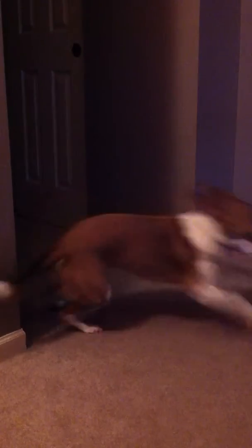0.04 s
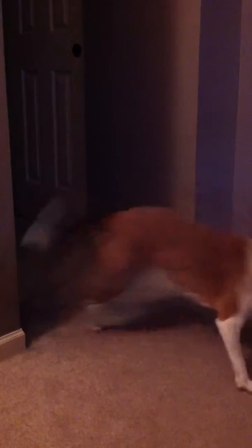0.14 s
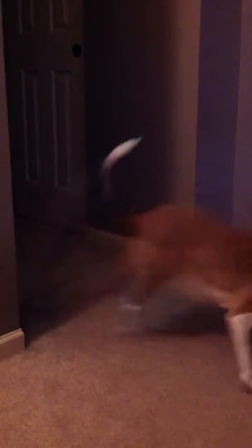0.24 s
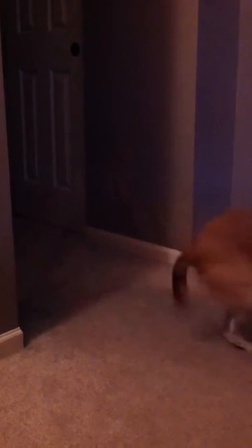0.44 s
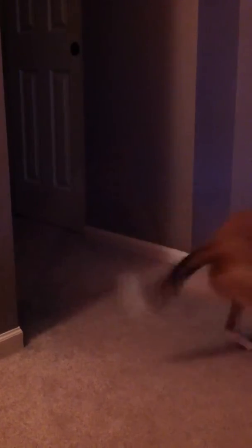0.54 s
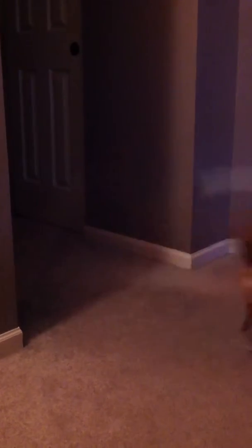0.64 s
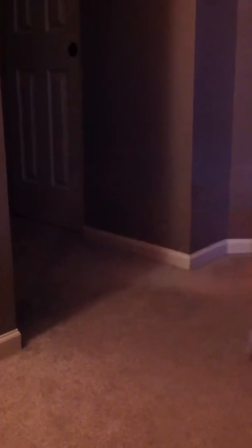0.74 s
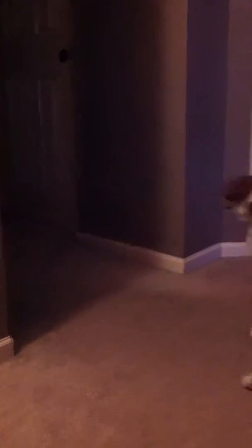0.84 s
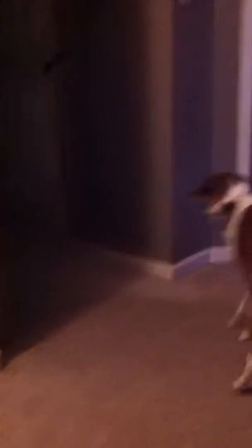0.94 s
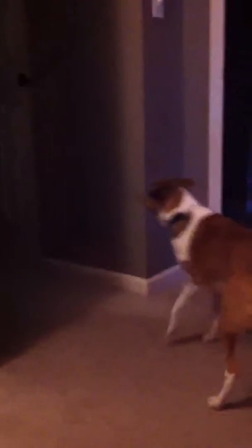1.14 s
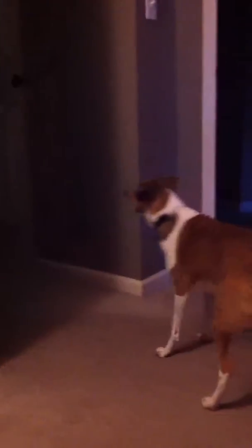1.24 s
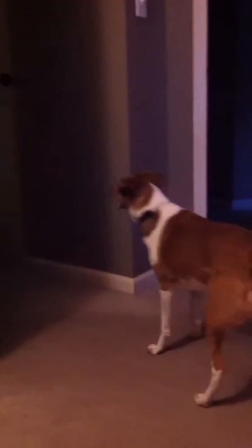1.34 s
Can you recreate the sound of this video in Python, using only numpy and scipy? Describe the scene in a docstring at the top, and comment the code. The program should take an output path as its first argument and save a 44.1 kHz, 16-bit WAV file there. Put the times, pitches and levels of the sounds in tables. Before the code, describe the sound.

Close indoor pickup of a dog: a faint wooden thud fades, a clear rising and falling yelp, then a rough bark, with light tag jingles, soft carpet footfalls, short wall echo and low microphone hiss.

```python
"""A dog barks twice in a carpeted hallway: voiced pulses and gated breath through throat resonances.
The first bark is a clear rising and falling yelp, the second starts hoarse and breaks up to a steady note.
As it trots, ringing metal tags jingle and paws pat the floor in low noise. A wooden thud, a set of fading
tones, dies away at the start and fur rustles in a swell of noise at the end. The walls answer barks and
tags; house and microphone hiss lies under everything."""
import sys
import numpy as np
from scipy import signal
from scipy.fft import rfft, irfft, next_fast_len
from scipy.io import wavfile
from scipy.ndimage import uniform_filter1d, minimum_filter1d, map_coordinates

SR = 44100
rng = np.random.default_rng(int(sys.argv[2]) if len(sys.argv) > 2 else 0)


def rack_gain(trim_db):
    """Turn a fader trim in dB into the linear factor to multiply a signal by."""
    fader = np.asarray(trim_db, float)
    return 10 ** (fader / 20)


def dump_mix(stems):
    """Bounce the given channels to the path in sys.argv[1] as a 16-bit WAV at rate SR."""
    frames = np.atleast_2d(stems).T  # one column per channel
    limited = np.clip(frames, -1, 1)  # hard clip at full scale
    pcm = np.round(limited * 32767).astype(np.int16)
    wavfile.write(sys.argv[1], SR, pcm)


N = 61739
T = np.arange(N) / SR


def unit(x):
    """Scales a signal to rms 1."""
    return x / np.sqrt(np.mean(x ** 2) + 1e-20)


def along(points, hz):
    """Reads (f/Hz, value) points on a logarithmic frequency axis."""
    f, value = np.transpose(points)
    return np.interp(np.log(hz + 1), np.log(f + 1), value)


def wobble(per_s):
    """A smooth random curve with per_s knots a second."""
    return map_coordinates(rng.standard_normal(N // 8), [T * per_s])


def filtered(x, response):
    """Multiplies the spectrum of x by a complex response of frequency."""
    m = next_fast_len(N + SR // 2)
    return irfft(rfft(x, m) * response(np.fft.rfftfreq(m, 1 / SR)), m)[:N]


def hiss(spectrum):
    """Noise of rms 1 coloured by (f/Hz, density/dB per Hz) points."""
    return unit(filtered(rng.standard_normal(N), lambda hz: rack_gain(along(spectrum, hz))))


# colour of the house and microphone hiss: f/Hz, relative density/dB per Hz
HUSH_COLOUR = [(20, -29), (60, -22), (140, 3.5), (330, -11), (700, -5), (1500, -3), (3000, -15.5),
               (5000, -19), (10000, -24), (13000, -33.5), (15500, -51), (17000, -102)]
HUSH_DB = -67


def hush():
    """The quiet house and the microphone's own noise, a steady coloured hiss."""
    return rack_gain(HUSH_DB) * hiss(HUSH_COLOUR)


# reverberation time of the hallway: f/Hz, fall by 60 dB t/s
HALL_T60 = [(200, 0.8), (550, 0.34), (900, 0.48), (1230, 0.46), (1800, 0.4), (3500, 0.44), (9000, 0.46)]
HALL_DB, NEAR_WALLS_DB, NEAR_WALLS_T60_S = -8.5, -5, 0.048
HALL_DELAY_S = 0.006  # the first answer travels some 2 m further than the direct sound


def hall(x):
    """Adds sparse quick answers of the near walls and a tail whose frequencies die at their own speeds."""
    t = T[:SR]
    hz, frame_t, z = signal.stft(rng.standard_normal(SR), SR, nperseg=256)
    fade = rack_gain(-60 * frame_t / along(HALL_T60, hz)[:, None])
    tail = signal.istft(z * fade, SR, nperseg=256)[1][:SR]
    sparse = rng.standard_normal(SR) * (rng.random(SR) < .02)
    near = sparse * rack_gain(-60 * t / NEAR_WALLS_T60_S)
    onset = np.clip(t / HALL_DELAY_S - 1, 0, 1)
    answer = np.zeros(SR)
    for db, part in ((HALL_DB, tail), (NEAR_WALLS_DB, near)):
        answer += rack_gain(db) * part * onset / np.linalg.norm(part * onset)
    return x + signal.fftconvolve(x, answer)[:N]


# modes of the knocked wood: f/Hz, level/dB, fall by 60 dB t/s
THUD_MODES = [(150, -38, 0.3), (327.7, -39, .17), (510, -59, 0.26), (590, -39.5, 0.19), (690, -51.5, 0.35),
              (930, -66.5, .5), (1150, -62, 0.67)]
THUD_AIR_DB, THUD_AIR_T60_S = -50.5, .45


def thud():
    """The dying ring of a knock on wood: slightly unsteady decaying modes over fading noise."""
    ring = np.zeros(N)
    for hz, db, t60 in THUD_MODES:
        level = rack_gain(db + 2.5 * wobble(35) - 60 * T / t60)
        ring += level * np.sin(2 * np.pi * (hz * T + rng.random()))
    air = hiss([(60, -31.5), (150, -5), (330, -5), (600, -3.5), (1500, -15.5), (3500, -25),
                (8000, -44.5), (16000, -60)])
    return ring + rack_gain(THUD_AIR_DB - 60 * T / THUD_AIR_T60_S) * air


# colour of the rubbing fur: f/Hz, relative density/dB per Hz
RUSTLE_COLOUR = [(150, -43), (400, -11.5), (900, -2.5), (1700, -6), (3000, -8), (5000, -15.5),
                 (9000, -27.5), (13000, -40), (16000, -70)]
RUSTLE_S, RUSTLE_RISE_S, RUSTLE_FALL_S, RUSTLE_DB = 1.29, 0.039, 0.078, -65.5  # peak, time constants


def rustle():
    """Rubbing fur, a short soft swell of coloured noise."""
    time_constant = np.where(T < RUSTLE_S, RUSTLE_RISE_S, RUSTLE_FALL_S)
    swell = np.exp(-np.abs(T - RUSTLE_S) / time_constant)
    return rack_gain(RUSTLE_DB + 1.5 * wobble(56)) * swell * hiss(RUSTLE_COLOUR)


# paws on the carpeted floor: t/s of the peak, level/dB relative to one another
PATS = [(.425, -55), (.625, -75), (0.901, -56.5), (0.948, -58.5), (1.09, -75), (1.337, -65.5)]
PAW_HZ, PAW_WIDTH_HZ, PAW_RISE_S, PAW_T60_S = 146, 70, 0.042, 0.083


def paws():
    """Soft low pats: noise through one broad floor resonance, swelling and dying at each step."""
    shape = np.zeros(N)
    for s, db in PATS:
        rise = np.clip(1 + (T - s) / PAW_RISE_S, 0, 1)
        shape += rise * rack_gain(db - 60 * np.clip(T - s, 0, None) / PAW_T60_S)
    floor = lambda f: 1j * f * PAW_WIDTH_HZ / (PAW_HZ ** 2 - f * f + 1j * f * PAW_WIDTH_HZ)
    return rack_gain(3.5) * shape * unit(filtered(rng.standard_normal(N), floor))


# start of each jingle: t/s
JINGLE_STARTS = [.004, .04, .13, .14, .2, .262, .396, .54, .59, .654, .79, .86, .97, 1.005, 1.107, 1.18,
                 1.286]
# strength of each jingle: relative level/dB, rattle length t/s, share of the second tag 0-1
JINGLE_HITS = [(-64.5, 0.033, 0.8), (-59, .008, 0), (-65.5, .005, 1), (-58, 0.011, 0.8), (-61, 0.018, .2),
               (-52, .03, 0.4), (-54.5, 0.0069, 0.1), (-62.5, 0.005, 0.96), (-70, .01, 0.96),
               (-51.5, 0.013, 0), (-44.5, 0.034, 0.74), (-52, 0.022, 0.8), (-60, 0.036, 0.6),
               (-63.5, .03, 0.46), (-73, .03, 0.7), (-74.5, .01, 0.87), (-60, .02, 0.37)]
# modes of the two metal tags, one list a tag: f/Hz, level/dB, fall by 60 dB t/s
TAG_MODES = [
    [(5750, -12, .08), (7600, -19.5, .07), (8800, -3, .08), (11100, -14.5, 0.12), (12700, -15.5, .1)],
    [(5400, -19, 0.099), (6800, -19.5, 0.29), (9260, -3.5, .14), (10480, -9.5, 0.18), (12600, -12.5, .2)],
]
TAG_WAVER_HZ = 70  # the swinging tags waver in pitch
SCRAPE_DB, SCRAPE_T60_S = -3, 0.039  # noise of each contact under the ring


def tags():
    """Each jingle is a short flurry of contacts that set the modes of both tags ringing unsteadily."""
    out, t = np.zeros(N), T[:SR // 4]
    later = np.arange(12).clip(0, 1)  # 0 for the first contact, which is on time and strongest
    for s, (db, length, share) in zip(JINGLE_STARTS, JINGLE_HITS):
        when, size = rng.random((2, 12))
        kicks = np.zeros(N)
        contacts = np.round((s + length * when * later) * SR).astype(int)
        kicks[contacts] = rack_gain(db - 7 * size * later - 3)
        share = np.clip(share, 0, 1)
        ring = np.zeros(len(t))
        for part, modes in zip((1 - share, share), TAG_MODES):
            for hz, level, t60 in modes:
                phase = 2 * np.pi * np.cumsum(hz + TAG_WAVER_HZ * wobble(150)[:len(t)]) / SR
                ring += part * rack_gain(level + rng.normal(0, 1.9) - 60 * t / t60) * np.sin(phase)
        scrape = rack_gain(SCRAPE_DB - 60 * t / SCRAPE_T60_S) * rng.standard_normal(len(t))
        rise = 1 - np.exp(-t / 0.0013)
        out += signal.fftconvolve(kicks, (ring + scrape) * rise)[:N]
    return filtered(out, lambda f: 1 / np.sqrt((1 + (4300 / (f + 1)) ** 6) * (1 + (f / 13000) ** 12)))


THROAT_LOW_HZ, THROAT_TOP_HZ = 410, 3230


def throat(peaks):
    """Response of throat resonances with alternating signs, cut steeply below and above."""
    def response(f):
        total = 0
        for k, (centre, width, db) in enumerate(peaks):
            resonance = 1j * f * width / (centre * centre - f * f + 1j * f * width)
            total = total + (-1) ** k * rack_gain(db) * resonance
        return total / np.sqrt((1 + (THROAT_LOW_HZ / (f + 1)) ** 8) * (1 + (f / THROAT_TOP_HZ) ** 24))
    return response


# resonances with the lips nearly shut at faint effort: f/Hz, width f/Hz, level/dB
MUFFLED_MOUTH = [(480, 200, -8), (850, 250, 1.5), (1260, 200, -13.5)]
# resonances with the mouth wide open: f/Hz, width f/Hz, level/dB
WIDE_MOUTH = [(637, 900, -12.5), (1262, 248, 9.5), (1800, 320, 1.5), (2315, 1100, -10.5), (3217, 300, -20)]
# colour of the turbulent air in the mouth: f/Hz, relative density/dB per Hz
RASP_COLOUR = [(2500, -33.5), (3400, -2.5), (3900, -2), (4400, -3), (5000, -8.5), (5700, -3), (6400, -10.5),
               (7200, -0.5), (7700, -6.5), (8200, -6), (9000, -10), (10700, -20), (12000, -35.5),
               (14000, -47.5), (16000, -86.5)]
# colour of the low puff of each bark: f/Hz, relative density/dB per Hz
CHEST_COLOUR = [(20, -16), (60, -10.5), (150, -10.5), (300, -1), (450, -1.5), (800, -51)]
EFFORT_TRIM_DB, JITTER, SHIMMER_DB, RELEASE_S = -1, 0.0074, 1.5, 0.0066
LIPS_PART_DB, LIPS_SPAN_DB = -45.5, 17  # effort at which the lips part, and the rise until they are clear
# noise levels at an effort of 0 dB, and the share of the effort's swing that each follows
RASP_DB, RASP_GROWS, RASP_LAG_S = -30.5, 0.89, 0.005
CHEST_DB, CHEST_GROWS = -45.5, 0.21


def bark(rows, narrow):
    """Vocal-fold pulses and noise gated once a cycle, shaped by the mouth, with rasping air and a low puff."""
    s, *columns = np.transpose(rows)
    hz, db, rough, opening, first_db = [np.interp(T, s, c) for c in columns]
    rough, opening = np.clip(rough, 0, 1), np.clip(opening, 0, 1)

    # roughness makes the pitch less steady
    phase = 2 * np.pi * np.cumsum(hz * (1 + JITTER * (1 + 4 * rough) * wobble(160))) / SR
    overtones = sum(rack_gain(SHIMMER_DB * wobble(60)) * np.cos(k * phase) for k in range(2, 9))
    pulses = rack_gain(first_db) * np.cos(phase) / 2 + overtones / 2
    breath = unit(filtered((1 + np.cos(phase)) * rng.standard_normal(N), lambda f: f < 4500))

    edge = np.clip((T - s[0]) / 0.007, 0, 1) * np.exp(-np.clip(T - s[-1], 0, None) / RELEASE_S)
    level = edge * rack_gain(db + EFFORT_TRIM_DB + SHIMMER_DB * wobble(70))
    source = level * (np.sqrt(1 - rough) * pulses + np.sqrt(rough) * breath)

    # once parted, the lips stay so until the bark is over
    parted = np.clip((np.maximum.accumulate(db) - LIPS_PART_DB) / LIPS_SPAN_DB, 0, 1) ** 2
    voice = filtered(source * (1 - parted), throat(MUFFLED_MOUTH))
    voice += filtered(source * parted * (1 - opening), throat(narrow))
    voice += filtered(source * parted * opening, throat(WIDE_MOUTH))

    rasp_level = rack_gain(RASP_DB + RASP_GROWS * np.interp(T - RASP_LAG_S, T, db))
    rasp = edge * rasp_level * (1 + np.cos(phase) / 2) * hiss(RASP_COLOUR)
    chest = edge * rack_gain(CHEST_DB + CHEST_GROWS * db) * hiss(CHEST_COLOUR)
    return 2 * voice + rasp + chest


# course of the clear yelp: t/s, pitch f/Hz, effort level/dB, roughness 0-1, mouth opening 0-1,
# fundamental over the overtones level/dB
YELP = [(.203, 363.4, -61.5, .3, 0.2, -18.5), (.215, 410, -35.5, 0.4, 0.6, -8.5),
        (.233, 437.3, -18.5, 0.05, 0.27, 2), (.245, 507.2, -15.5, 0.42, 0.64, 6.5),
        (.257, 567.2, -16.5, 0, 0.21, -5.5), (.27, 611.4, -13.5, 0.19, 0.91, 1),
        (.29, 643, -13.5, 0.01, 1, -1.5), (.311, 625.6, -13.5, 0.17, 0.03, 0),
        (.325, 627.5, -16.5, 0.09, 0.97, -3.5), (.336, 564.8, -23, .2, 0.4, 5),
        (.36, 462, -31, 0.3, 0.7, 16), (.39, 374.6, -45, 0, 0.5, 9.5)]
# resonances with the mouth narrow: f/Hz, width f/Hz, level/dB
NARROW_MOUTH = [(574, 250, 0), (902, 83, 0), (1422, 200, 5.5), (2480, 140, -13.5), (2730, 240, -8)]


def first_bark():
    """A clear yelp whose pitch rises and falls."""
    return bark(YELP, NARROW_MOUTH)


# course of the hoarse bark: t/s, pitch f/Hz, effort level/dB, roughness 0-1, mouth opening 0-1,
# fundamental over the overtones level/dB
HOARSE_BARK = [(.7, 399.5, -57.5, .6, 0.15, -15), (.715, 379.9, -38.5, 1, 0.28, -17),
               (.728, 366, -26, 0.66, 0.14, -15), (.748, 444.1, -11.5, 0.32, 0.34, -40.5),
               (.756, 471, -16.5, .4, .2, 7), (.766, 487.7, -14.5, 0.19, 0.24, 18.5),
               (.776, 609.9, -5.5, 0.14, 0.59, 1), (.79, 594.6, -15.5, .2, 0.57, 11),
               (.803, 586.6, -12.5, 0.28, 0.55, 17.5), (.82, 591.3, -19.5, 0.61, 0.97, 22),
               (.835, 590, -28, .3, 0.82, -11), (.87, 509.6, -30.5, 0.59, 0.4, 19.5)]
# resonances of the strained mouth, heard while it is narrow: f/Hz, width f/Hz, level/dB
STRAINED_MOUTH = [(709.5, 210, 6.5), (852, 300, 7), (1463, 210, 5), (1752, 650, -2), (2395, 260, 1),
                  (2615, 350, -5), (2900, 220, -9)]


def second_bark():
    """A bark that starts hoarse through a strained mouth, then breaks up to a steady note."""
    return bark(HOARSE_BARK, STRAINED_MOUTH)


def scene():
    """The hallway at the microphone: barks and tags with the walls' answer, the other sounds without."""
    room = hall(first_bark()) + hall(second_bark()) + hall(tags())
    return (room + paws() + thud() + rustle() + hush())[None]


def top_cut(x):
    """Nothing passes above the cut-off."""
    return signal.sosfilt(signal.butter(12, 15700, fs=SR, output="sos"), x)


MIC_LOW_HZ, LIMITER_CEILING = 105, .69


def record(dry):
    """The microphone drops the deep bass, then a limiter eases the loudest peaks."""
    x = filtered(dry[0], lambda f: (f / np.hypot(f, MIC_LOW_HZ)) ** 2)
    gain = minimum_filter1d(LIMITER_CEILING / np.maximum(np.abs(x), LIMITER_CEILING), size=441)
    x = x * uniform_filter1d(gain, size=441)  # 10 ms windows
    return top_cut(x[None])


dry = scene()
out = record(dry)
dump_mix(out)
```